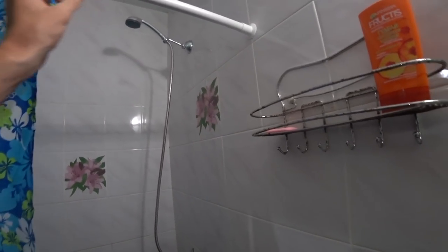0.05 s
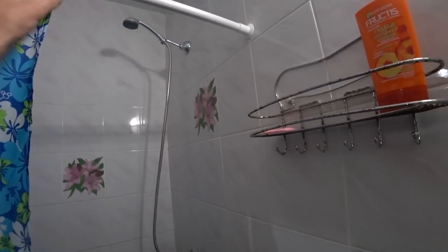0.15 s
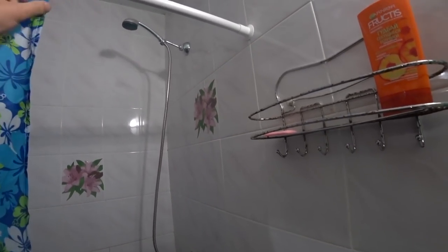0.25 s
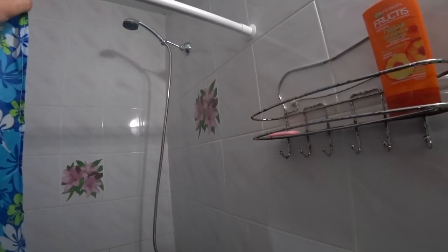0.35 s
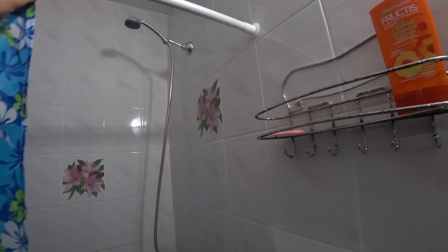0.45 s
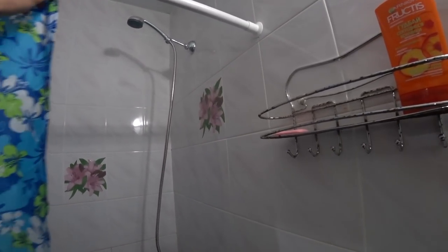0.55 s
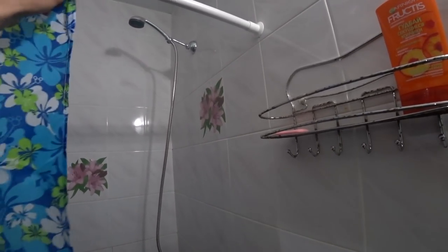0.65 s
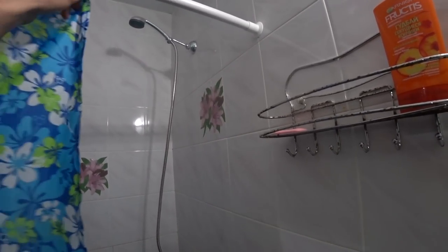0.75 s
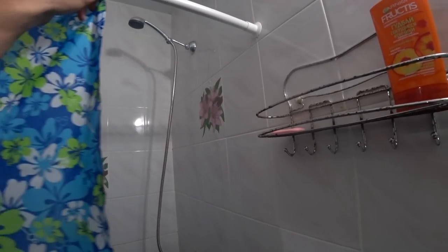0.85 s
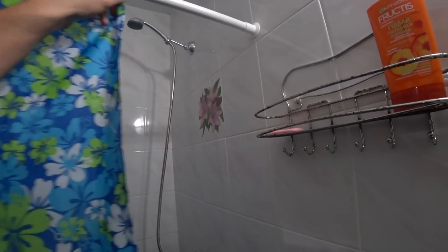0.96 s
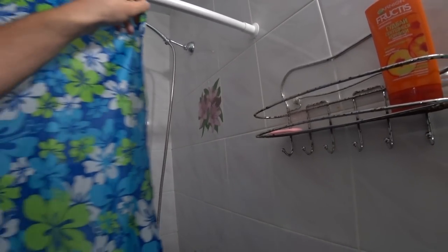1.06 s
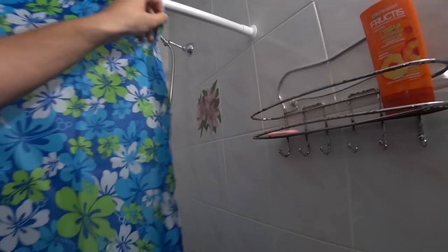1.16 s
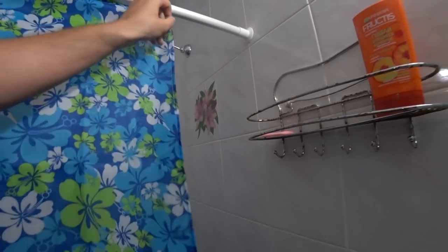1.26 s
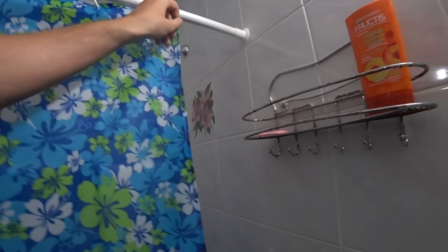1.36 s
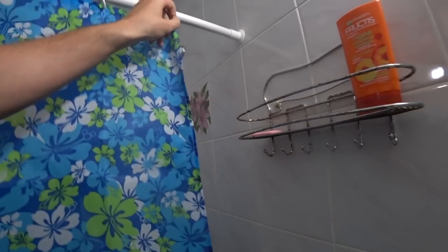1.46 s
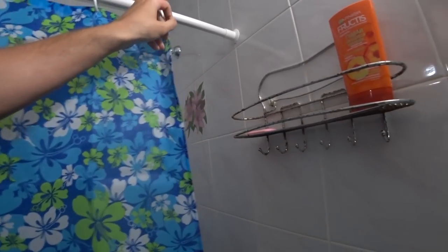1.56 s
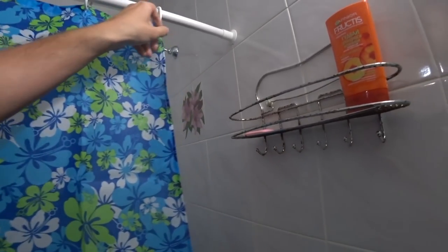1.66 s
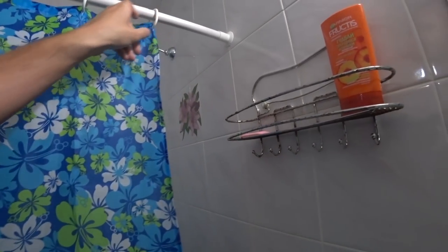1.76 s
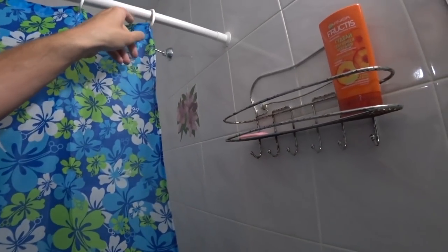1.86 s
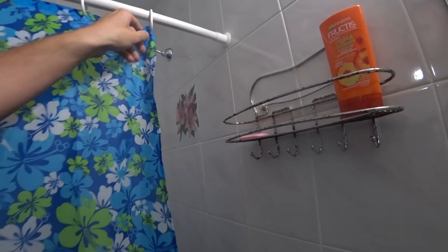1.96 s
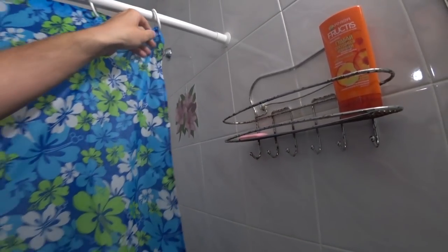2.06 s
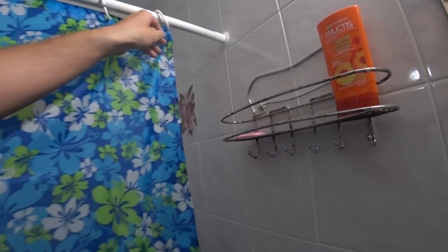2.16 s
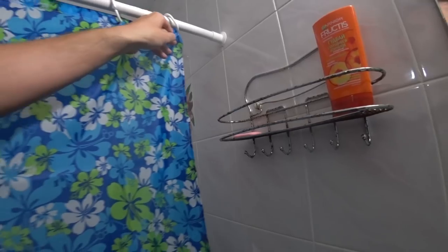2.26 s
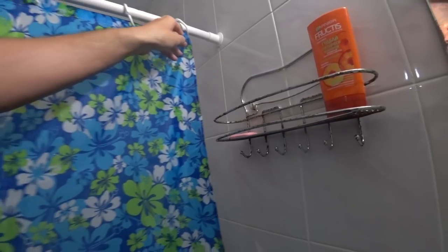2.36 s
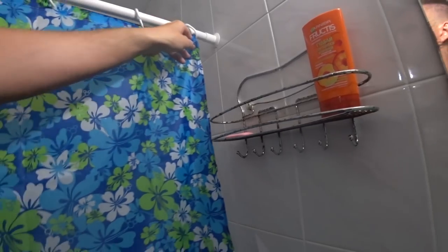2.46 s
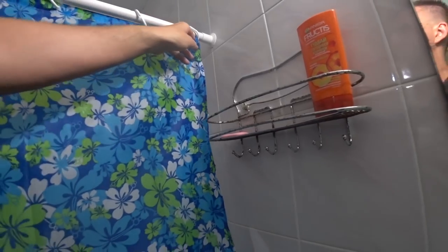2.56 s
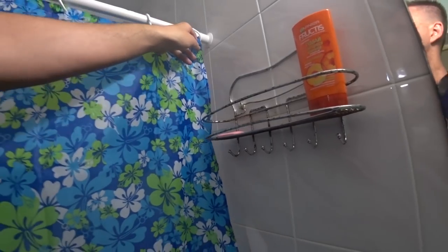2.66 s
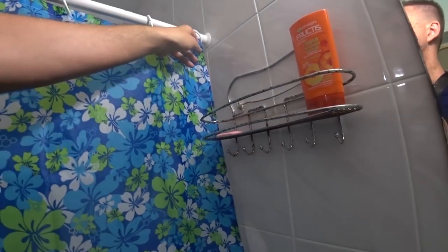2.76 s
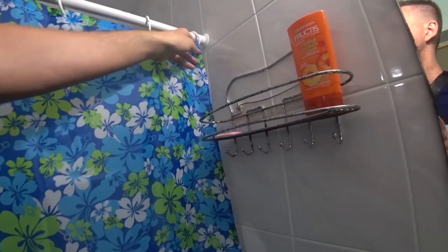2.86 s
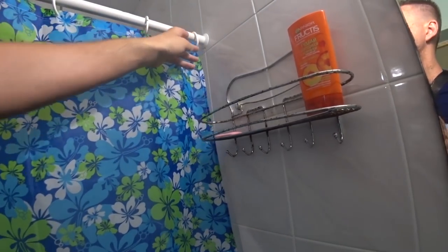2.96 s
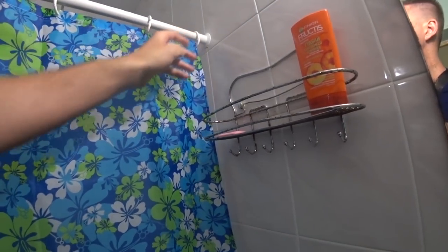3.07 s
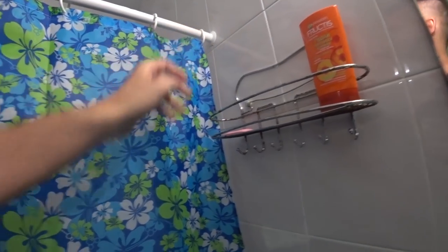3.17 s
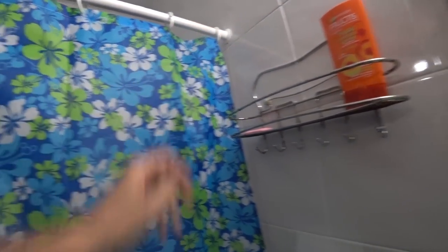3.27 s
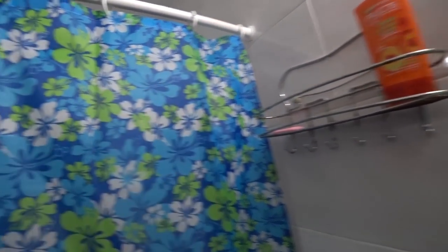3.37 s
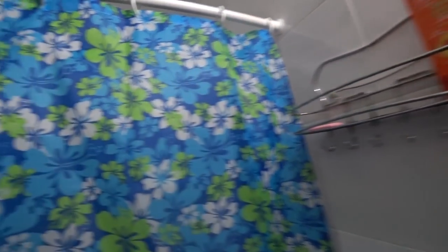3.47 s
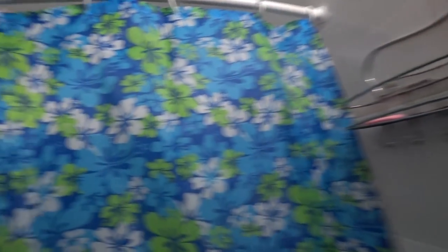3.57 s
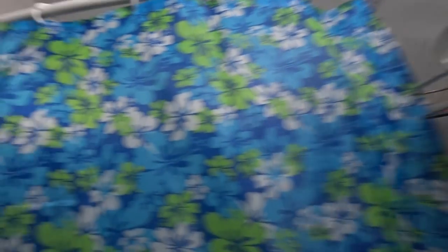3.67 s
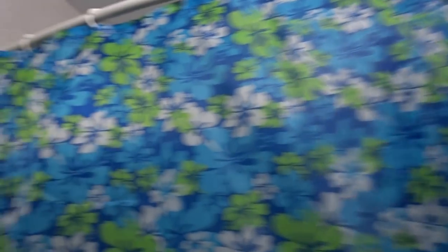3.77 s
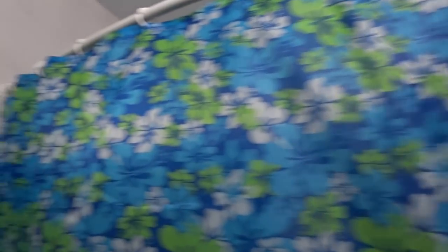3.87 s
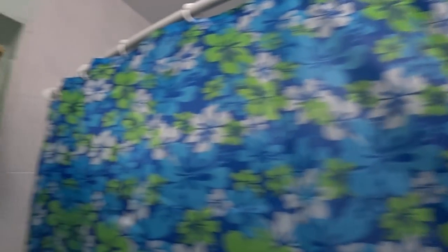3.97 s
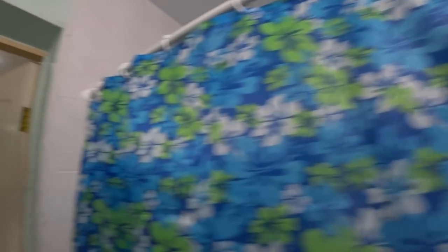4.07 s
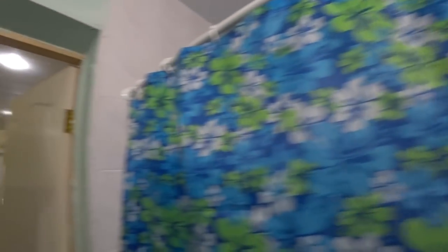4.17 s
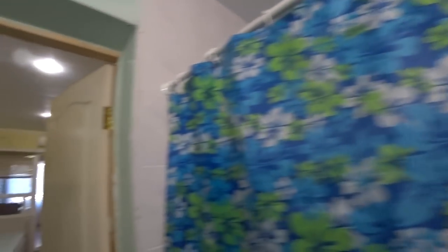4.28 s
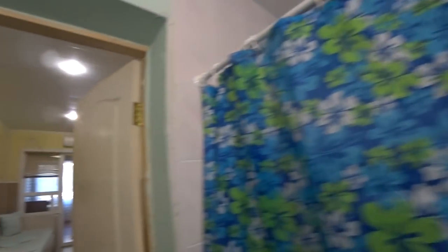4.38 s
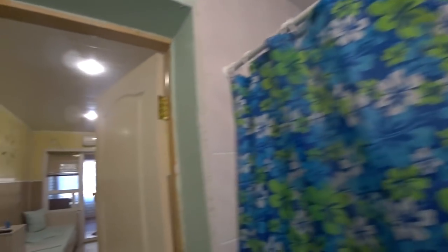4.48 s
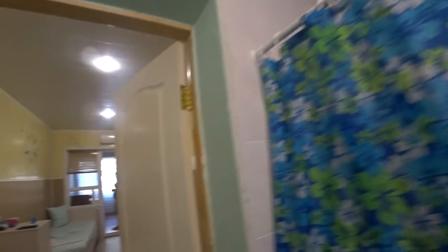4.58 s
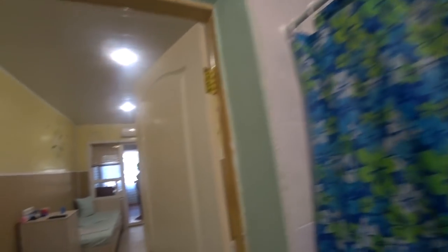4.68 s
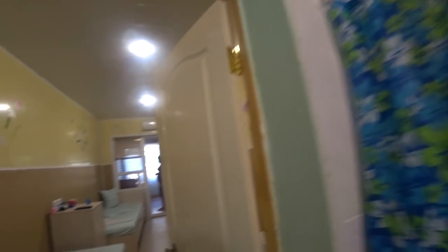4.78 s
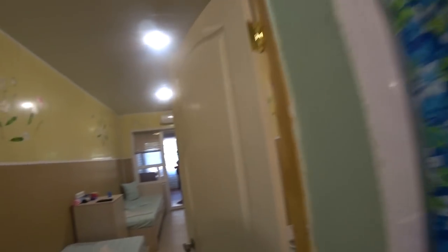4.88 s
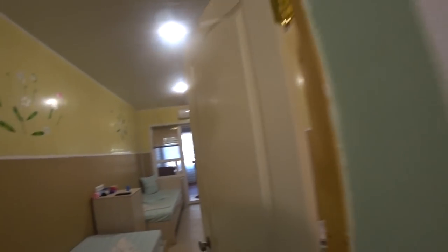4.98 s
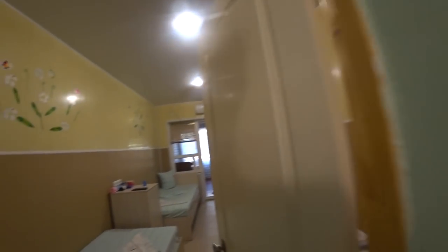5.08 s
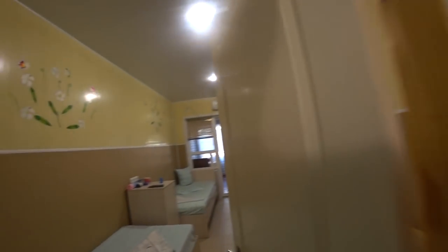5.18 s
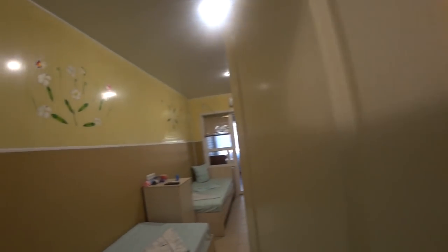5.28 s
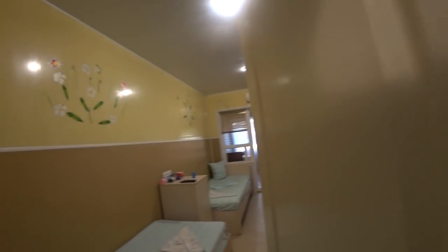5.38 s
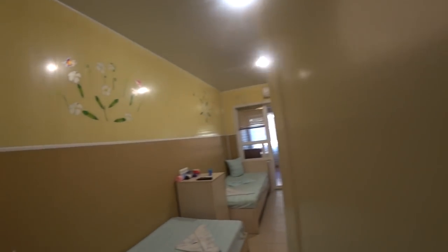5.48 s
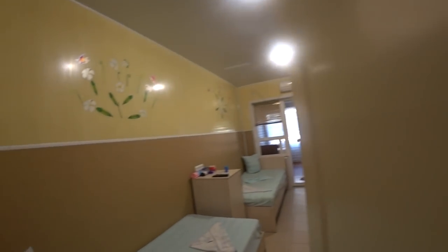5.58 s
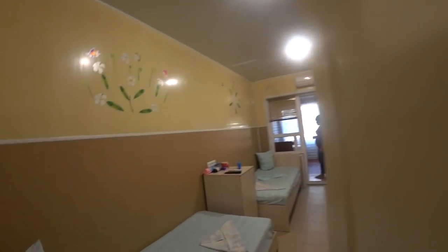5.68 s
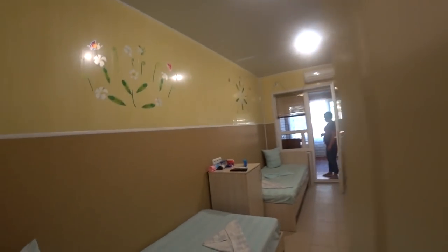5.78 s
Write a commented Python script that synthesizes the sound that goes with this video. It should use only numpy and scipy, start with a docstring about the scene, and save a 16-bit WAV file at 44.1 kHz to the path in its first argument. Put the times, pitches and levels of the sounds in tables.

```python
"""A fading scrape over a steady hush opens the scene: a shower curtain is drawn along its rod in a tiled bathroom.
Two long, halting pulls follow. Friction grains excite the hollow rod and its metal rings, which hiss and sing;
chattering contacts with decaying tones make the rings clack, and the leading one strikes the end mount.
Then someone turns to the door: cloth swishes from filtered grains, a soft step from low noise bursts,
a few faint ticks from resonant noise, and one sharp knock from a snap with quick rebounds."""
import sys
import numpy as np
from scipy import signal
from scipy.fft import rfft, irfft
from scipy.io import wavfile

SR = 44100
rng = np.random.default_rng(int(sys.argv[2]) if len(sys.argv) > 2 else 0)


def transcribe(signal):
    """Save signal, clipped to [-1, 1], as a 16-bit WAV file at the path in sys.argv[1]."""
    frames = np.atleast_2d(signal).T
    limited = np.clip(frames, -1, 1)
    pcm = np.round(limited * 32767).astype(np.int16)
    wavfile.write(sys.argv[1], SR, pcm)


N = 257103

TIME = np.arange(N) / SR
HIT_TIME = np.arange(SR // 2) / SR  # half a second, for single hits and echo tails
BINS = np.fft.rfftfreq(8192, 1 / SR)


def amp(db):
    """Decibels to gain."""
    return 10 ** (np.asarray(db) / 20)


def evened(x):
    """Scales to rms 1."""
    return x / np.sqrt(np.mean(x ** 2) + 1e-20)


def read(points, hz):
    """Reads a curve at any frequency, along a log frequency axis."""
    f, value = np.transpose(points)
    return np.interp(np.log(hz + 1), np.log(f + 1), value)


def add(mix, s, sound):
    """Puts a sound into the mix at s seconds."""
    part = mix[max(round(s * SR), 0):][:len(sound)]
    part += sound[:len(part)]


def through(x, response):
    """Passes x through an impulse response."""
    return signal.oaconvolve(x, response)[:len(x)]


def body(spectrum, modes=()):
    """Causal impulse response, of energy 1, of a broad spectrum with resonances standing out of it."""
    db = read(spectrum, BINS)
    for hz, width, rise in modes:
        db = db + rise / (1 + (2 * (BINS - hz) / width) ** 2)
    # minimum phase: the Hilbert transform of the log gain gives the phase
    log_gain = np.log(amp(np.r_[db, db[-2:0:-1]]))
    response = np.fft.ifft(np.exp(np.conj(signal.hilbert(log_gain)))).real[:len(BINS)]
    return response / np.linalg.norm(response)


def band_pass(hz, width):
    """Impulse response, of energy 1, of one resonance."""
    b, a = signal.iirpeak(hz, hz / width, fs=SR)
    ring = signal.lfilter(b, a, signal.unit_impulse(len(HIT_TIME)))
    return ring / np.linalg.norm(ring)


def resonate(x, hz, width):
    """A single band-pass resonance that keeps the power of white noise."""
    return through(x, band_pass(hz, width))


def mode(hz, t60):
    """One struck mode dying away by 60 dB in t60 seconds."""
    return np.cos(2 * np.pi * hz * HIT_TIME) * np.exp(-np.log(1000) * HIT_TIME / t60)


def grains(per_s, spread_db, smooth):
    """Friction: tiny slips of very unequal size over an even rub."""
    sizes = amp(spread_db * np.minimum(rng.exponential(1, N), 4))
    slips = rng.standard_normal(N) * sizes * (rng.random(N) < per_s / SR)
    return evened(evened(slips) + smooth * rng.standard_normal(N))


def burst(decay):
    """A noisy contact that dies away with time constant decay, in seconds."""
    return rng.standard_normal(len(HIT_TIME)) * np.exp(-HIT_TIME / max(decay, 5e-4))


def clatter(decay, snap):
    """A hard contact: one snap and a fast run of uneven rebounds whose energy grows with their length."""
    rebounds = burst(decay) * (rng.random(len(HIT_TIME)) < .25)
    rebounds *= np.sqrt(decay * SR / 2) / np.linalg.norm(rebounds)
    return rebounds + snap * signal.unit_impulse(len(HIT_TIME))


def stroke(start, length, attack_s, release_db_per_s, swell_db=0):
    """Gain of one movement: it gets going, holds or swells evenly, and dies away."""
    t = TIME - start
    held_db = swell_db * (np.clip(t / length, 0, 1) - .5)
    return np.clip(t / attack_s, 0, 1) * amp(held_db - release_db_per_s * np.maximum(t - length, 0))


def together(gains):
    """Gain of unrelated sounds heard at once: their powers add."""
    return np.sqrt(sum(gain ** 2 for gain in gains))


def waver(depth_db, per_s):
    """A gain that wanders at random."""
    knots = rng.standard_normal(size=512)
    return amp(depth_db * np.interp(TIME * per_s, np.arange(len(knots)), knots))


# Stereo width. [f/Hz, gain on the side signal/dB]
SIDE_WIDTH = [(50, -8.5), (150, -13), (600, -7), (2000, -6), (4500, -8), (8000, -9), (11000, -7.5)]


def spread(mid, side):
    """Left and right as sum and difference of a middle and a quieter side signal, so they sound much alike."""
    side_gain = amp(read(SIDE_WIDTH, np.fft.rfftfreq(len(side), 1 / SR)))
    side = irfft(rfft(side) * side_gain, len(side))
    return np.array([mid + side, mid - side])


# How long the tiles hold each band. [f/Hz, t60/s]
TILE_DECAY = [(150, 0.7), (700, 1), (2000, 0.75), (4500, 0.31), (7500, 0.39), (11000, 0.23)]


def tile_echoes():
    """One tail that thickens as it goes, each band dying at its own speed."""
    density = np.minimum(.03 + 5 * HIT_TIME, 1)
    present = rng.random(len(HIT_TIME)) < density
    taps = rng.standard_normal(len(HIT_TIME)) * present / np.sqrt(density)
    hz, t, z = signal.stft(taps * (HIT_TIME > .002), SR, nperseg=256)
    fade = amp(-60 * t / read(TILE_DECAY, hz)[:, None])
    tail = signal.istft(z * fade, SR, nperseg=256)[1][:len(taps)]
    return tail / np.linalg.norm(tail)


def bathroom(x, wet_db, cycles_per_s=4.5):
    """Direct sound plus tile echoes; as the source moves, two echo patterns trade places back and forth."""
    turn = np.pi * cycles_per_s * TIME
    echoes = 0
    for share in (np.cos(turn), np.sin(turn)):
        pattern = spread(tile_echoes(), tile_echoes())
        echoes = echoes + signal.oaconvolve((x * share)[None], pattern, axes=1)[:, :N]
    return (x + amp(wet_db) * echoes) / np.hypot(1, amp(wet_db))


# Colour of the hush. [f/Hz, level/dB]
AIR_COLOUR = [(15, -63), (25, -45), (212, -17.5), (267, -12.5), (303, -10), (422, -9.5), (668, -8),
              (740, -6.5), (1110, -4), (1360, -7.5), (1550, -7.5), (1950, -8.5), (2270, -11.5),
              (6280, -16.5), (11000, -20), (14300, -52), (22000, -120)]


def air():
    """The steady hush of the rooms: filtered noise with a wide side signal."""
    mid, side = (through(rng.standard_normal(N), body(AIR_COLOUR)) for _ in range(2))
    return amp(-58.5) * evened(spread(mid, amp(9.0) * side))


# The rod flexes in its mounts when the curtain is tugged. [t/s, level/dB, time scale of the push/s]
TUGS = [(0.683, -65, 0.0025), (1.311, -70, 0.0048), (2.535, -62, 0.0026)]


def tugs():
    """Each tug is one low push with a dip either side, felt more than heard."""
    out = np.zeros(N)
    for s, db, scale in TUGS:
        u = (TIME - s) / scale
        out += amp(db) * (1 - 2 * u ** 2) * np.exp(-u ** 2)
    return out


# Colour of rubbing fabric. [f/Hz, level/dB]
CLOTH_COLOUR = [(100, -52), (250, -21), (500, -18), (900, -15), (1500, -7), (2500, -1), (4000, -2.5),
                (5500, -2.5), (7700, -1.5), (11000, -8)]
# Cloth brushing along. [start t/s, length/s, relative level/dB]
SWISHES = [(3.65, .06, -60.5), (3.71, 0.045, -53.5), (4.145, 0.033, -50.5), (4.26, 0.027, -58),
           (4.345, 0.11, -43), (4.975, 0.045, -55), (5.19, 0.075, -58.5)]
SWISH_ATTACK_S, SWISH_RELEASE_DB_PER_S = 0.021, 100
RUSTLE = (3.55, 2.3, -66)  # clothes rustle faintly all through the turn; same columns


def cloth():
    """Fabric rubbing: very fine, dense slips, in a few swishes over a faint rustle."""
    rub = through(grains(per_s=2700, spread_db=6, smooth=0.57), body(CLOTH_COLOUR))
    moves = SWISHES + [RUSTLE]
    gain = together(amp(db) * stroke(s, length, SWISH_ATTACK_S, SWISH_RELEASE_DB_PER_S)
                    for s, length, db in moves)
    return amp(1.5) * evened(bathroom(rub, wet_db=5.0)) * gain


# Dull bumps of the curtain, then steps and scuffs.
# [t/s, relative level/dB, centre f/Hz, width/Hz, decay time constant/s]
THUDS = [(0.140, -59.5, 485, 500, .06), (0.640, -50, 630, 700, 0.043), (1.225, -50.5, 596, 600, .03),
         (1.440, -56.5, 410, 305, 0.16), (1.862, -54.5, 784, 1220, 0.07), (2.59, -59.5, 450, 500, 0.27),
         (4.140, -54.5, 510, 760, 0.062), (4.570, -61.5, 755, 825, 0.1), (4.750, -67.5, 457, 280, 0.42),
         (5.170, -66.5, 930, 900, 0.19)]


def thuds():
    """Soft, low blows: noise bursts with a rounded onset, held to one band."""
    out = np.zeros(N)
    for s, db, hz, width, decay in THUDS:
        push = burst(decay) * (1 - np.exp(-HIT_TIME / 0.0065))
        dull = through(band_pass(hz, width), band_pass(hz, width))  # twice: steep skirts
        add(out, s, amp(db) * through(push, dull / np.linalg.norm(dull)))
    return amp(2.0) * bathroom(out, wet_db=-10.5)


# Faint ticks. [t/s, relative level/dB, centre f/Hz, width/Hz]
TICKS = [(1.632, -49, 7640, 4030), (1.796, -50.5, 7500, 4950), (3.137, -51, 8400, 1200),
         (3.138, -53, 5670, 600), (5.462, -53, 8900, 303)]


def ticks():
    """Small high ticks, each a short noise burst in one resonance."""
    out = np.zeros(N)
    for s, db, hz, width in TICKS:
        add(out, s, amp(db) * resonate(burst(decay=0.0067), hz, width))
    return amp(5.0) * bathroom(out, wet_db=11.0)


def knock(hits, colour, decay, snap, wet_db):
    """A hard contact that rebounds a few times, each hit colouring its clatter with the struck body."""
    out = np.zeros(N)
    for s, db in hits:
        add(out, s, amp(db) * through(clatter(decay, snap), colour))
    return bathroom(out, wet_db)


# The knock at the door and its rebounds. [t/s, relative level/dB]
DOOR_HITS = [(5.5352, -46.5), (5.5412, -43.5), (5.549, -55), (5.5675, -51)]
# Colour of the knock. [f/Hz, level/dB]
DOOR_COLOUR = [(40, -52), (200, -9), (900, -12), (1900, -17), (2400, -6.5), (3200, -6), (4000, -5),
               (5500, -3), (7500, -3), (8800, -1.5), (10000, -12), (11000, -5.5)]
# Resonances of the knock. [f/Hz, width/Hz, rise/dB]
DOOR_MODES = [(2360, 200, 7), (4000, 200, 7), (6960, 230, 5), (8000, 250, 4)]


def door_knock():
    """One sharp knock at the door: a strong snap and quick rebounds."""
    hits = knock(DOOR_HITS, body(DOOR_COLOUR, DOOR_MODES), decay=0.0057, snap=6.9, wet_db=-1.5)
    return amp(3.5) * hits


# The leading ring strikes the end mount of the rod and rebounds. [t/s, level/dB]
END_HITS = [(2.974, -37), (2.984, -39.5), (3.002, -45), (3.022, -43.5)]
# Colour of the end mount. [f/Hz, level/dB]
END_COLOUR = [(40, -53.5), (200, -17), (700, -8), (1500, -8.5), (2100, -9), (3000, -4.5), (4100, -3),
              (5000, -16), (7000, -19), (11000, -27)]
# Resonances of the end mount. [f/Hz, width/Hz, rise/dB]
END_MODES = [(2030, 90, 4), (3050, 70, 8)]


def end_stop():
    """The leading ring meets the end mount: a mild snap and short rebounds."""
    return knock(END_HITS, body(END_COLOUR, END_MODES), decay=0.0039, snap=1.5, wet_db=1.0)


# Colour of the hollow rod, for clacks and sliding. [f/Hz, level/dB]
ROD_COLOUR = [(30, -58), (70, -57), (110, -29.5), (180, -32), (260, -17), (500, -10), (900, -5.5),
              (1500, -2.5), (2200, 3.5), (3200, 1), (4800, -8), (7000, -5), (11000, -32)]
# Resonances of the rod. [f/Hz, width/Hz, rise/dB]
ROD_MODES = [(130, 35, 6), (265, 25, 6), (372, 25, 5), (500, 20, 6), (772, 40, 6), (1061, 42, 12),
             (1251, 30, 12), (1425, 20, 5), (1690, 30, 5), (2010, 60, 5), (2286, 80, 7), (2520, 30, 4),
             (2965, 90, 6), (4470, 40, 5)]
# Modes of the rings, no two rings quite alike. [f/Hz, width/Hz, rise/dB]
RING_MODES = [(5630, 40, 5), (5760, 35, 4), (5945, 40, 6), (6200, 60, 2), (6435, 40, 4), (6600, 40, 5),
              (6995, 40, 3), (7660, 60, 2), (10830, 260, 3)]
# Main pitch of four rings. {ring: f/Hz}
RING_HZ = {"a": 5628, "b": 5657, "c": 5761, "d": 5944}
OVERTONE_HZ = 10715  # shared by the four rings
# Colour of a ring hit. [f/Hz, level/dB]
CLACK_COLOUR = [(25, -76), (100, -37), (500, -45), (2000, -3), (3500, -2.5), (5200, -4.5), (6000, 3.5),
                (7500, 1.5), (9200, -6.5), (11000, -6.5)]
# The hardest ring hits.
# [t/s, relative level/dB, ring, relative ring tone/dB, relative overtone/dB, chatter time constant/s]
CLACKS = [ (0.392, -47, "a", -0.5, -23, 0.0057), (0.468, -35.5, "a", -4, -4.5, 0.0022),
          (0.4998, -22, "c", -9.5, -9, 0.0023), (0.504, -23, "b", -0.5, -17, 0.0011),
          (0.685, -39, "d", -11, -30, 0.0067), (0.6979, -23.5, "d", -18, -30, 0.0044),
          (0.735, -20, "d", -33, -5, 0.0033), (0.7846, -19, "c", -6.5, -26, 0.0022),
          (0.819, -23, "a", -23, -22, .003), (0.897, -34.5, "a", 5, -1, .005),
          (0.9319, -30.5, "a", 4.5, -32, .003), (0.9713, -30.5, "a", -10, -6, 0.0069),
          (1.066, -33.5, "a", -5, -19, .003), (1.2602, -31.5, "a", -20, -3, 0.007),
          (1.3106, -20.5, "a", -9, -30, 0.0044), (1.3339, -18.5, "a", -12, -30, .004),
          (1.4057, -17.5, "d", -24, -2.5, 0.0063), (1.4195, -24, "a", -3, 3, 0.0017),
          (1.978, -34, "a", -16, -20, 0.0069), (2.0342, -29, "d", -24, -29, 0.0021),
          (2.4297, -28.5, "d", -27, -23, 0.011), (2.5396, -25, "d", -20, -32, 0.0038),
          (2.5824, -29, "a", -4.5, -30, 0.0037), (2.6259, -29.5, "c", -12, -30, 0.0038),
          (2.9322, -45.5, "d", -7, -29, .005)]


def clacks(ring_t60=0.13, overtone_t60=0.079):
    """Rings hit each other and the rod: a bright chatter, a knock in the tube, and the struck ring ringing on."""
    out = np.zeros(N)
    tube_knock = amp(-9.5) * body(ROD_COLOUR, ROD_MODES)
    struck = body(CLACK_COLOUR, RING_MODES) + tube_knock
    for s, db, ring, ring_db, overtone_db, chatter in CLACKS:
        hit = through(clatter(chatter, snap=5.6), struck)
        tone = amp(ring_db) * mode(RING_HZ[ring], ring_t60)
        tone += amp(overtone_db) * mode(OVERTONE_HZ, overtone_t60)
        add(out, s, amp(db) * (hit + amp(-3.0) * tone))
    return amp(1) * bathroom(out, wet_db=4)


# Each surge of the curtain along the rod.
# [start t/s, length/s, rod scrape/dB, ring hiss/dB, ring singing/dB, swell from start to end/dB]
PULLS = [(-0.04, 0.26, -58, -62.5, -80, -27), (0.32, 0.083, -50.5, -55, -62, 10.5),
         (0.53, 0.12, -48, -45.5, -64, 6), (0.666, 0.11, -37.5, -36.5, -51.5, 0),
         (0.887, .36, -38, -41, -60, 5.5), (1.31, 0.17, -39, -48, -50, 3.5),
         (2.055, 0.363, -41.5, -51, -55, 5), (2.419, 0.23, -39.5, -44, -50, 4.5),
         (2.683, 0.095, -43, -58.5, -70, 1), (2.951, 0.078, -48, -62, -64, -6)]
PULL_ATTACK_S, PULL_RELEASE_DB_PER_S = 0.026, 94.5
# A fold opens and its bunch of rings skids along. [start t/s, length/s, hiss level/dB]
SKIDS = [(0.221, .025, -58), (0.496, .04, -51), (0.717, 0.06, -47), (1.266, 0.089, -34), (1.929, 0.21, -42),
         (2.423, 0.064, -44), (2.534, 0.061, -54)]
SKID_ATTACK_S, SKID_RELEASE_DB_PER_S = 0.051, 147
SKID_SCRAPE_DB, SKID_SING_DB = -10, -16  # against the hiss of the skid


def friction():
    """Levels of scrape, hiss and singing: each pull drives all three, and each skid adds to them."""
    skid = together(amp(db) * stroke(s, length, SKID_ATTACK_S, SKID_RELEASE_DB_PER_S)
                    for s, length, db in SKIDS)
    moves = [np.outer(amp([SKID_SCRAPE_DB, 0, SKID_SING_DB]), skid)]
    for s, length, scrape_db, hiss_db, sing_db, swell_db in PULLS:
        pull = stroke(s, length, PULL_ATTACK_S, PULL_RELEASE_DB_PER_S, swell_db)
        moves.append(np.outer(amp([scrape_db, hiss_db, sing_db]), pull))
    # the rings catch and let go, so no pull is even
    return together(moves) * waver(depth_db=0.7, per_s=22)


# Colour of the hissing rings. [f/Hz, level/dB]
HISS_COLOUR = [(60, -39), (300, -37.5), (1500, -12.5), (3500, -5), (5200, -3.5), (5700, -2), (6500, -6.5),
               (8000, -2.5), (9200, -6), (11000, -5.5)]


def sliding(overtone_db=-24):
    """Slips under the moving rings excite the hollow rod, hiss in the rings and keep two ring modes singing."""
    rod_slips = grains(per_s=1100, spread_db=3.3, smooth=.2)
    ring_slips = grains(per_s=800, spread_db=3.5, smooth=.2)
    scrape = evened(bathroom(through(rod_slips, body(ROD_COLOUR, ROD_MODES)), wet_db=6.5))
    hiss = evened(bathroom(through(ring_slips, body(HISS_COLOUR, RING_MODES)), wet_db=14.0))
    rub = rng.standard_normal(N)
    sing = resonate(rub, RING_HZ["a"], width=30)
    sing += amp(overtone_db) * resonate(rub, OVERTONE_HZ, width=90)
    sing = evened(bathroom(sing, wet_db=-8))
    scrape_gain, hiss_gain, sing_gain = friction()
    return scrape_gain * scrape + hiss_gain * hiss + sing_gain * sing


def scene():
    """Mixes all layers; the curtain hangs slightly to the left."""
    background = air() + tugs() + cloth() + thuds() + ticks() + door_knock()
    left_right = amp([[.45], [-.45]])
    curtain = (end_stop() + clacks() + sliding()) * left_right
    return background + curtain


def record(dry):
    """Cuts the treble steeply above 11060 Hz."""
    low_pass = signal.firwin(1023, 11060, window=("kaiser", 8), fs=SR)
    return signal.oaconvolve(dry, low_pass[None], "same")


dry = scene()
out = record(dry)
transcribe(out)
```